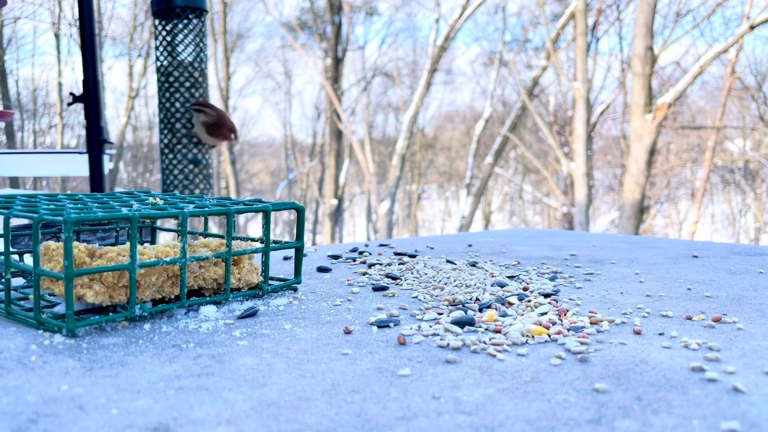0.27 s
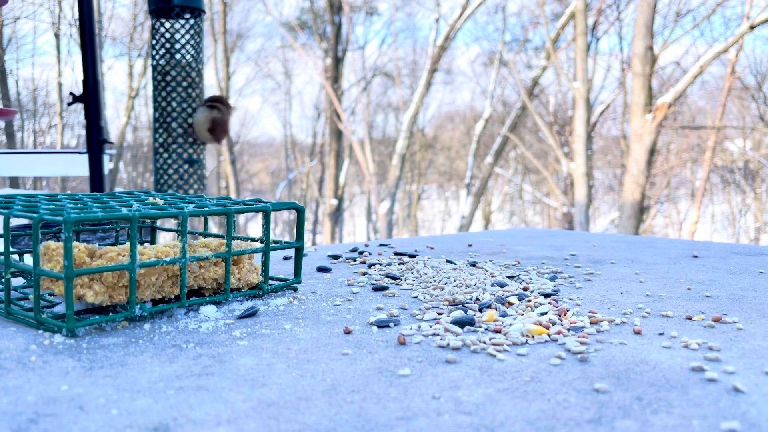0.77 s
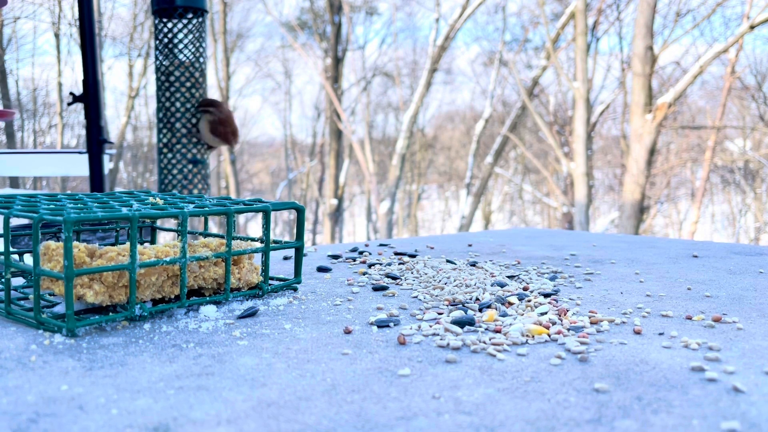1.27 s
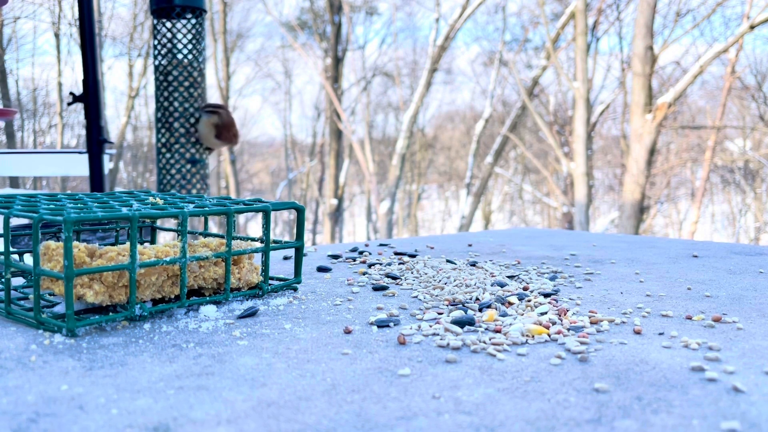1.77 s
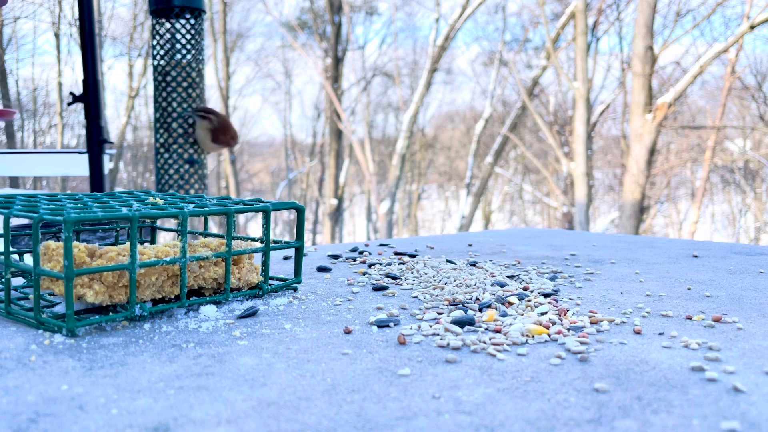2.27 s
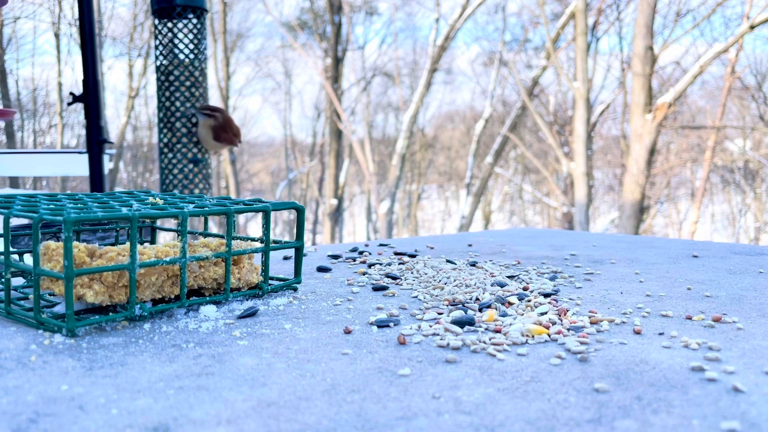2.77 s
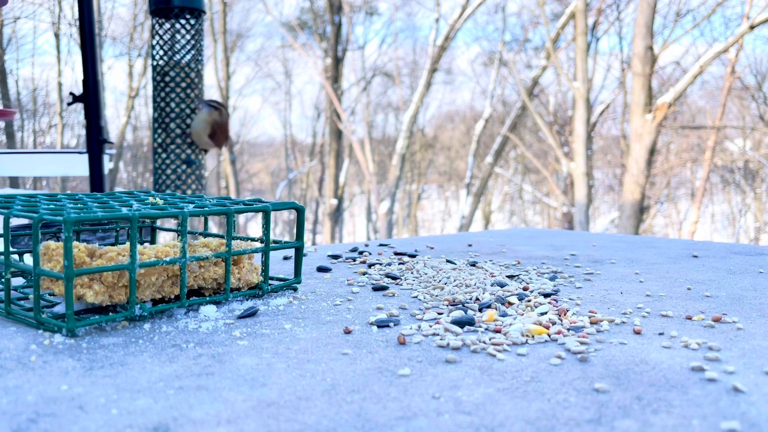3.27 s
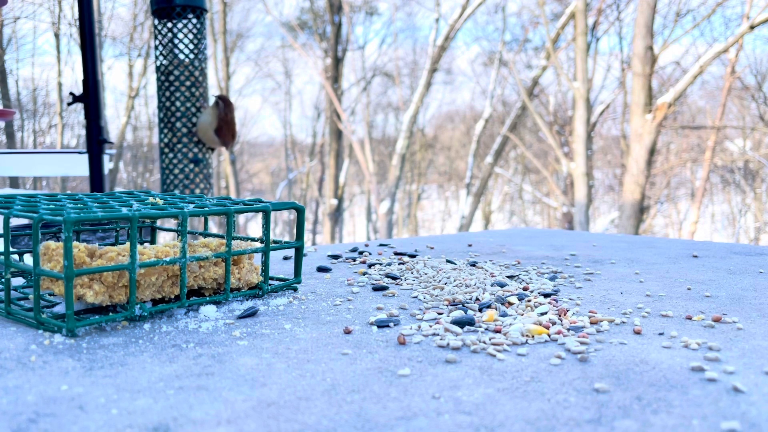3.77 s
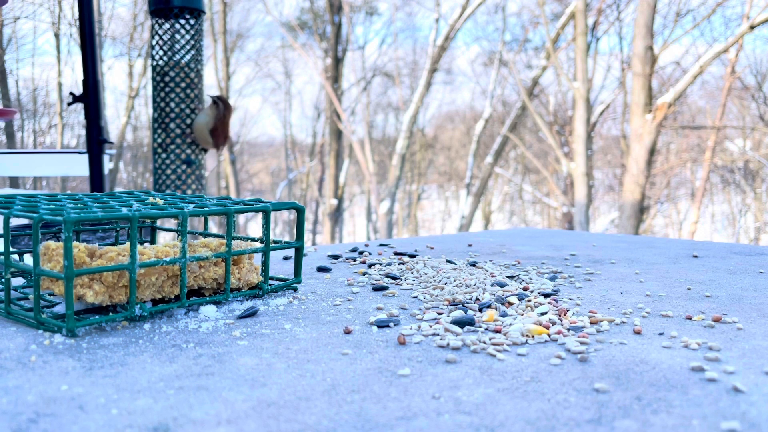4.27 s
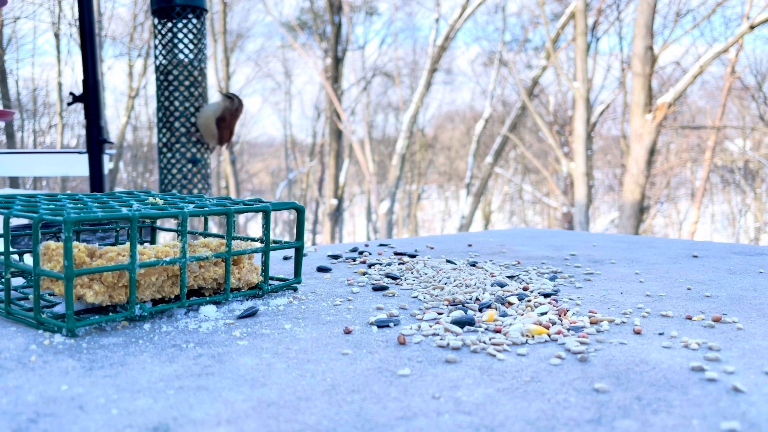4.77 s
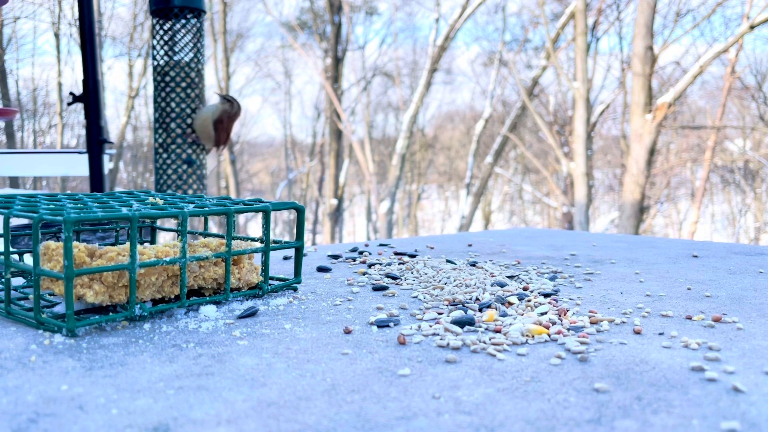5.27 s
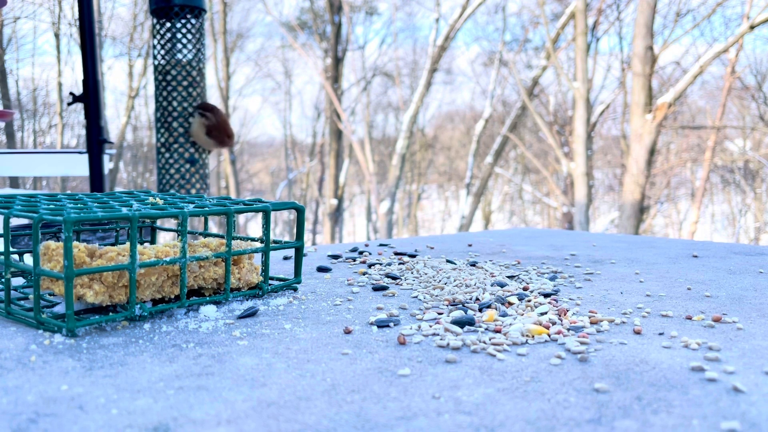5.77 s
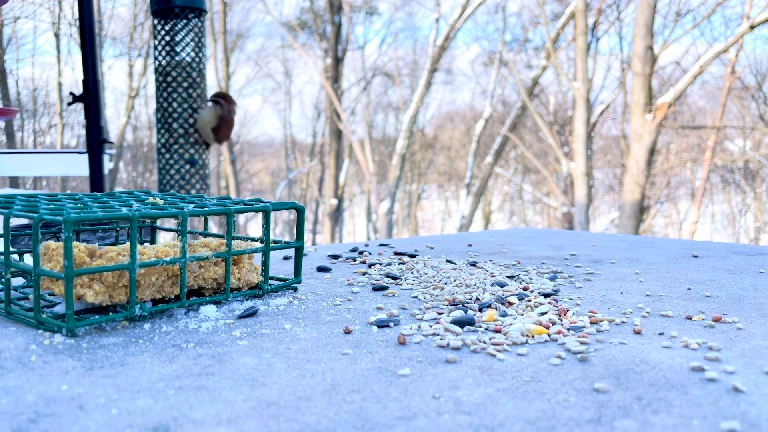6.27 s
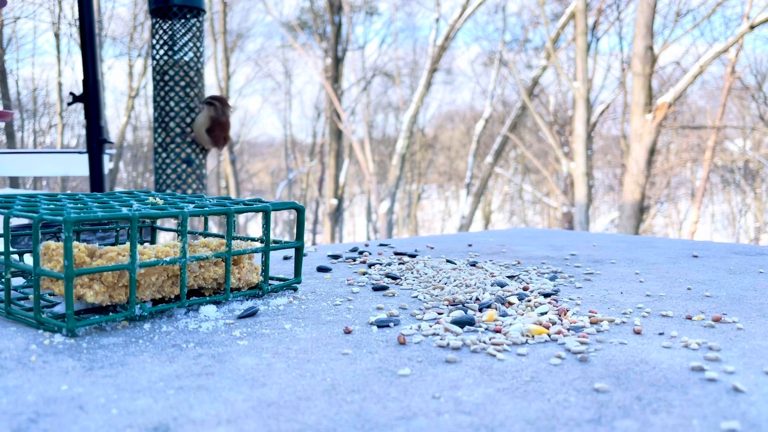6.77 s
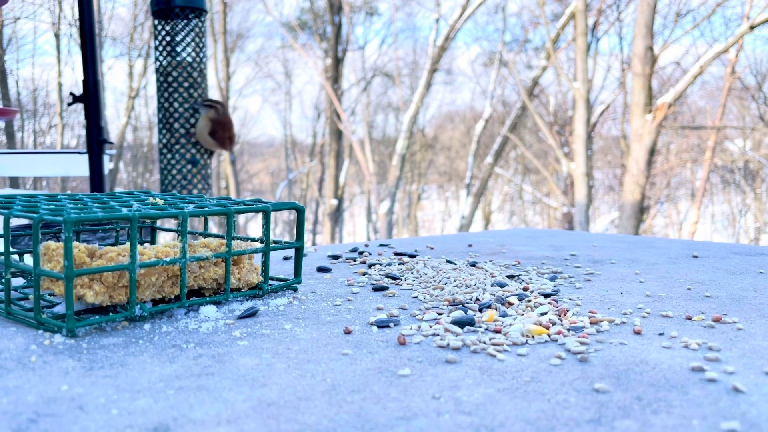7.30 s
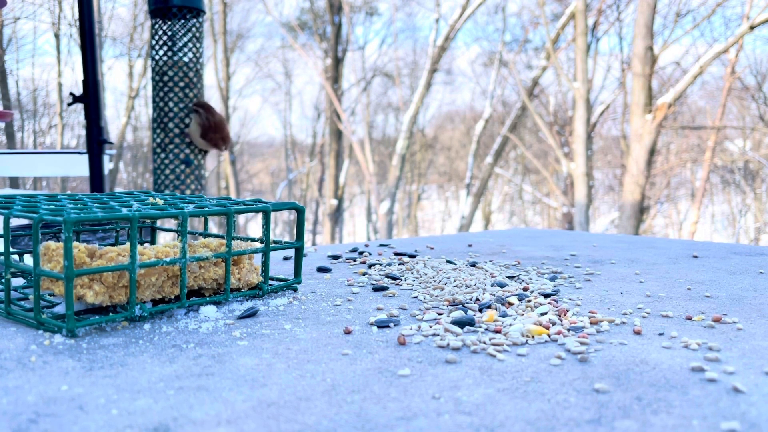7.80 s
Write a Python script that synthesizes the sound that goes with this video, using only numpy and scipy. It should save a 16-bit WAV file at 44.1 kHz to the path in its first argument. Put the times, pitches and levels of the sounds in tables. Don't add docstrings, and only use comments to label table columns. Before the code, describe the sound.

Outdoor winter woods with a soft even road rumble and faint hiss. Crisp little metallic ticks of a beak on mesh come first, mixed with quick claw scratches, then a quiet stretch with a sharp high chip and faint rising song echoing off trunks. Feather rustles lead into more pecks, while low wind buffeting swells over the last seconds.

```python
import sys
import numpy as np
from scipy import signal
from scipy.fft import rfft, irfft, next_fast_len
from scipy.io import wavfile
from scipy.ndimage import uniform_filter1d

SR = 44100
rng = np.random.default_rng(int(sys.argv[2]) if len(sys.argv) > 2 else 0)


def digitize_waveform(pressure):
    field = np.atleast_2d(pressure).T
    bounded = np.clip(field, -1, 1)
    quanta = np.round(bounded * 32767).astype(np.int16)
    wavfile.write(sys.argv[1], SR, quanta)


def boost_factor(decibels):
    exponent = np.asarray(decibels, float) / 20
    return 10 ** exponent


N = 354519
HIT = 8192
SOFT = signal.butter(8, 12700, fs=SR, output="sos")

# f/Hz, width/Hz, level/dB
WIRE_RINGS = [(5780, 740, -0.5), (6740, 790, 0), (8550, 640, -4)]
# f/Hz, width/Hz, level/dB
TICK_RINGS = [(9140, 2400, -11), (11170, 1800, -2), (11800, 1200, 1), (12950, 760, -1.5), (14800, 600, -15),
              (15900, 900, -26.5)]
# t/s, knock level/dB, wire level over knock/dB, tick level over knock/dB, knock f/Hz
BEAK_BLOWS = [(0.1103, -54.5, -7, -1, 2930), (0.814, -54.5, 2, 4.5, 3050),
              (1.0425, -51.5, -4.5, -2.5, 3520), (1.2994, -52, 0, -0.5, 2830), (1.5756, -50, -17, -4, 3000),
              (6.1524, -58, 1.5, -1.5, 3100), (6.3984, -57, 0.6, 4, 4100), (6.659, -49.5, -0.5, -0.5, 4470),
              (6.935, -51.5, -2, 0.1, 3300), (7.6792, -55, 4, -7.5, 4080), (7.9968, -52, 0, -4.5, 2770)]


def pecks():
    out, ms = np.zeros(N + HIT), np.arange(HIT) / SR * 1000
    draws = rng.standard_normal((len(BEAK_BLOWS), 3, HIT))
    tube = signal.butter(2, (900, 4650), "band", fs=SR, output="sos")
    for (s, knock_db, wire_db, tick_db, spot_hz), (sign, size, seeds) in zip(BEAK_BLOWS, draws):
        blow = boost_factor(-21) * sign * np.exp(0.42 * size) * np.exp(-((ms - 1.2) / 1.17) ** 2)
        blow[58] += 1
        blow[40 + round(8 * np.tanh(seeds[1]))] += boost_factor(-4.5) * np.sign(seeds[0])

        fizz = sign * np.exp(0.34 * size) * boost_factor(-6.5 - 60 * ms / 16.5)
        fizz = fizz + signal.sosfilt(SOFT, sign * boost_factor(-43.5 - 60 * ms / 580))
        settle = seeds * np.exp(0.61 * size) * boost_factor(-44 - 60 * ms / 320) * np.clip(ms / 3.3, 0, 1)

        knock = signal.sosfilt(tube, blow + settle + resonate(blow, [(spot_hz, 700, 1.5)]))
        wires = -resonate(blow + 0.3 * settle, WIRE_RINGS)
        tick = resonate(fizz + 0.5 * blow, TICK_RINGS)
        for part, db in ((knock, 4.5), (wires, wire_db), (tick, tick_db)):
            energy = np.sum(part[:400] ** 2)
            out[round(s * SR):][:HIT] += boost_factor(knock_db + db + 25) * part / np.sqrt(energy)
    return out[:N]


# t/s, tick level/dB, lightness (tick over tube knock)/dB, contact/ms
CLAW_SCUFFS = [(0.1217, -76, -5, 2.3), (0.1501, -68.5, 5.5, 2.6), (0.1897, -56.5, 14, 2.3),
               (0.221, -58, 20, 2.6), (0.2676, -49.5, 46, 1.8), (0.32, -73, 16, 1.2), (0.432, -63, 20, 3),
               (0.835, -93, -18, 1.5), (2.074, -64.5, 16.5, 1.8), (3.5552, -84, -1, 2.2),
               (6.5609, -75, 14, .8), (7.0598, -75, 20, .8)]


def scuffs():
    return mesh(CLAW_SCUFFS, wire_follows=0.74, wire_db=11, grit=0.43, rise=0.98, tail_db=-19.5, t60=0.18)


# t/s, tick level/dB, lightness/dB, contact/ms
FEATHER_BRUSHES = [(.018, -84, 14, 6), (.086, -76, 7, 4.9), (.115, -76, 3, 27), (.195, -83, -1, 10),
                   (1.17, -89, 3, 10), (3.87, -96, 10, 14.4), (4.02, -85, 15, 14), (4.11, -93, 14, 14),
                   (4.26, -94, 14, 8), (5.602, -62, 22, 0.57), (5.61, -81, 16, 14), (5.872, -69, 16, 8.3),
                   (5.952, -73.5, 15, 8.9), (6.615, -82, 16, 8), (5.9, -80, 16, 40)]


def brushes():
    rub = mesh(FEATHER_BRUSHES, wire_follows=0.62, wire_db=5, grit=0.8, rise=0.6, tail_db=-42, t60=.1)
    return signal.sosfilt(SOFT, rub)


# f/Hz, width/Hz, level/dB
TUBE_RINGS = [(1700, 520, -1), (2720, 950, -1.5), (4100, 720, -1), (5240, 1500, -6.5)]


def mesh(touches, wire_follows, wire_db, grit, rise, tail_db, t60):
    out, ms = np.zeros(N + HIT), np.arange(HIT) / SR * 1000
    draws = rng.standard_normal((len(touches), 2, HIT))
    for (s, tick_db, light_db, contact_ms), (sign, size) in zip(touches, draws):
        grow = ms / np.clip(contact_ms, .2, 40)
        blow = grow ** rise * np.exp(rise * (1 - grow)) * np.exp(grit * size)
        rattle = boost_factor(tail_db - 60 * ms / (1000 * t60)) * np.clip(ms / 2, 0, 1) * np.exp(0.13 * size)
        soft_rattle = signal.sosfilt(SOFT, sign * rattle)
        tube = (TUBE_RINGS, 19.5 - light_db)
        wires = (WIRE_RINGS, wire_db - wire_follows * light_db)
        for rings, db in (tube, wires, (TICK_RINGS, 8)):
            part = resonate(sign * blow, rings)
            scale = boost_factor(tick_db + db) / np.max(np.abs(part))
            tail = np.std(blow[:200]) * resonate(soft_rattle, rings)
            out[round(s * SR):][:HIT] += scale * (part + tail)
    return out[:N]


def resonate(x, rings):
    out = 0
    for k, (hz, width_hz, db) in enumerate(rings):
        r = np.exp(-np.pi * width_hz / SR)
        poles = [1, -2 * r * np.cos(2 * np.pi * hz / SR), r * r]
        out = out + (-1) ** k * boost_factor(db) * signal.lfilter([1 - r * r, 0, r * r - 1], poles, x)
    return out


# f/Hz, level/dB, phase/rad
LEFT_TO_RIGHT = [(0, 0, 0), (2000, -3.4, -1.8), (2500, -8.6, -2.7), (3000, -14, -2.2), (3500, -19, -3.5),
                 (4000, -12, -5.5), (5000, -5.3, -6.2), (5800, 0.5, -4.9), (6900, 0.3, -5.4),
                 (7600, -3.8, -4.0), (8700, -0.6, -3.05), (13500, 1, -0.3), (22050, 0, 0.3)]


def ports(x):
    size = next_fast_len(N + 512)
    right_db, phase = curve(LEFT_TO_RIGHT, np.arange(size // 2 + 1) * SR / size)
    right = irfft(rfft(x, size) * boost_factor(right_db) * np.exp(1j * phase), size)[:N]
    return np.array([x, right])


# t/s, length/s, start f/Hz, settling f/Hz, level/dB
CHIP_CALLS = [
    (.711, 0.027, 8850, 7170, -70),
    (3.890, 0.027, 8200, 7400, -71),
    (4.348, 0.04, 8200, 6980, -59.5),
]


def chips():
    return calls(CHIP_CALLS, bend=230, wobble=.008, sag=0.09)


# t/s, length/s, start f/Hz, settling f/Hz, level/dB
TICK_CALLS = [
    (2.615, .016, 5100, 4900, -80),
    (4.022, .01, 6700, 6400, -86),
]


def near_ticks():
    return calls(TICK_CALLS, bend=60, wobble=.02, sag=0)[0]


# t/s, length/s, start f/Hz, settling f/Hz, level/dB
HOOKED = [
    (2.79, .16, 2990, 2446, -84.5),
    (3.05, .08, 2470, 2370, -93),
]
# t/s, length/s, start f/Hz, settling f/Hz, level/dB
SLIDING = [
    (.87, .13, 2900, 1900, -92),
    (7.82, .27, 3020, 1450, -86.5),
]


def whistles():
    hooked = calls(HOOKED, bend=28, wobble=.003, sag=0)
    return (hooked + calls(SLIDING, bend=2.9, wobble=0.0033, sag=0))[0]


# t after start/s, length/s, start f/Hz, settling f/Hz, level/dB
NOTES = [
    (0, 0.27, 7180, 11550, -10.5),
    (0.275, 0.21, 7200, 9550, -1),
]
# t/s, level/dB, share of the pitch rise 0-1
SUNG = [
    (2.44, -88.5, 0.78),
    (5.16, -92, .62),
]


def song():
    rows = []
    for s, db, span in SUNG:
        for after, length, start_hz, end_hz, note_db in NOTES:
            top_hz = start_hz + span * (end_hz - start_hz)
            rows.append((s + after, length, start_hz, top_hz, db + note_db))
    return calls(rows, bend=4.5, wobble=0.022, sag=0)[0]


def calls(rows, bend, wobble, sag):
    out = np.zeros((2, N + SR))
    quiver = rms_one(uniform_filter1d(rng.standard_normal(N + SR), size=150))
    for s, length, start_hz, end_hz, db in rows:
        t = np.arange(int(length * SR)) / SR
        hz = end_hz + (start_hz - end_hz) * np.exp(-bend * t)
        hz = hz * (1 - sag * boost_factor(db + 60.5) * (t / length) ** 7)
        shaky_hz = hz * (1 + wobble * quiver[round(s * SR):][:len(t)])
        phase = 2 * np.pi * np.cumsum(shaky_hz) / SR
        breath = np.sin(np.pi * t / length)
        octave = boost_factor(db + 40) * breath * np.sin(2 * phase)
        pair = np.array([np.sin(phase), octave])
        out[:, round(s * SR):][:, :len(t)] += boost_factor(db) * breath ** 0.57 * pair
    return out[:, :N]


def echoes(x, t60, delay, sparse):
    t = np.arange(SR // 2) / SR
    swarm = rng.standard_normal(len(t)) * np.exp(sparse * rng.standard_normal(len(t)))
    swarm = swarm * boost_factor(-60 * t / t60) * np.clip(t / delay - 1, 0, 1)
    return signal.fftconvolve(x, swarm / np.sqrt(np.sum(swarm ** 2)))[:N]


def birds():
    chip, octave = chips()
    far = song() + whistles()
    direct = ports(chip + octave + near_ticks()) + boost_factor(2) * far
    sent = boost_factor(-2.5) * chip + boost_factor(4.5) * far
    woods = np.array([echoes(sent, t60=0.52, delay=0.0049, sparse=0.46) for side in (0, 1)])
    return direct + woods


# peak t/s, half width/s, level/dB, quickness (0 thump - 1 flutter)
WIND_EDDIES = [(.04, 0.054, -51.5, 0.12), (.11, 0.016, -47, 1.1), (.22, 0.029, -48, 0.55),
               (.83, 0.036, -57, 0.5), (1.25, 0.078, -57, 0.86), (1.43, .05, -59, 0.54),
               (1.88, 0.033, -60, 0.93), (2.28, .04, -52.5, 0.13), (3.08, 0.03, -51, 0.26),
               (3.17, 0.062, -51.5, .4), (3.265, 0.028, -41.5, 0.49), (3.4, 0.03, -52, 0.53),
               (3.51, 0.045, -52, .15), (3.65, .06, -50, 0.3), (3.78, 0.034, -52.5, 0.65),
               (4.41, .08, -64, 0.58), (4.84, 0.031, -53.5, .3), (6.15, 0.044, -47.5, 0.42),
               (6.54, 0.057, -56.5, 1.1), (6.70, 0.026, -39.5, 0.55), (6.77, 0.077, -42.5, 0.54),
               (7.05, 0.057, -41.5, .55), (7.16, 0.018, -44, 0.55), (7.235, .05, -33.5, 0.93),
               (7.36, .06, -40, 0.17), (7.565, 0.032, -34, 0.44), (7.65, 0.067, -43.5, 0.87),
               (7.775, 0.033, -34, .7), (7.86, 0.076, -44, 0.5), (8.01, .04, -46.5, 0.53)]


def wind():
    thump = gusts(38, 60, alike=0.64, even=.45)
    flutter = gusts(59.5, 100.3, alike=.62, even=0.56)
    lumps = [rms_one(uniform_filter1d(uniform_filter1d(row, size=3000), size=3000))
             for row in rng.standard_normal((2, N))]
    slow = boost_factor(-67 + 3 * lumps[0])
    quick = boost_factor(-61 + 3 * lumps[1])
    for s, half_s, db, quickness in WIND_EDDIES:
        push = boost_factor(db) * swell(s, half_s)
        turn = np.pi / 2 * np.clip(quickness, 0, 1)
        slow = slow + np.cos(turn) * push
        quick = quick + np.sin(turn) * push
    return slow * thump + quick * flutter


def gusts(low_hz, high_hz, alike, even):
    band = signal.butter(2, [low_hz, high_hz], "band", fs=SR, output="sos")
    mid, side = signal.sosfilt(band, rng.standard_normal((2, N + SR)))[:, SR:]
    size = np.sqrt(uniform_filter1d(mid ** 2, size=1200))
    mid = rms_one(mid / (size + 0.09 * np.mean(size)) ** even)
    return mid + np.sqrt((1 - alike) / (1 + alike)) * rms_one(side) * [[1], [-1]]


def swell(s, half_s):
    return np.exp(-((np.arange(N) / SR - s) / np.clip(half_s, .01, 1)) ** 2)


def engine():
    t = np.arange(N) / SR
    note = boost_factor(-55.5) * swell(7.09, 0.21) * np.sin(2 * np.pi * 281 * t)
    return note * boost_factor([[-8], [3]]) + boost_factor(-107) * np.sin(2 * np.pi * 4260 * t)


# f/Hz, level per Hz/dB
ROAD_COLOUR = [(40, -21.5), (80, -15.5), (118, -0.5), (153, -6), (251, -6), (382, -11), (449, -9.5),
               (739, -7.5), (1150, -14), (1740, -26.5), (2310, -45), (2900, -60.5), (5000, -92)]
# f/Hz, level per Hz/dB
HISS_COLOUR = [(1500, -3), (2600, 5), (4500, 4.5), (6500, 1.5), (9000, -0.5), (12700, -2.5), (13200, -16.5),
               (17000, -21)]


def road_and_hiss():
    return boost_factor(-50) * diffuse(ROAD_COLOUR) + boost_factor(-88) * diffuse(HISS_COLOUR)


# f/Hz, likeness 0-1, phase/rad, right level/dB
ALL_AROUND = [(0, 0.87, -0.5, -1), (203, 0.68, 0, 0.5), (546, 0, 1, -3), (990, 0.38, -1, -1.5),
              (2500, 0, -0.5, -2.5), (4900, 0.3, -3, -3.5), (6100, .05, 1, -6.5), (7400, 0.3, -4, -1.5),
              (7820, 0.94, -3, -1.2), (9900, 0.94, -2.5, .3), (10800, 0.9, -2.0, -1), (12800, 1, 0.3, 1),
              (22050, .5, 1.5, -1)]


def diffuse(colour):
    size = next_fast_len(N)
    hz = np.arange(size // 2 + 1) * SR / size
    table = np.array(colour)
    gain = boost_factor(np.interp(np.log(hz + 1), np.log(table[:, 0]), table[:, 1], left=-80))
    alike, phase, right_db = curve(ALL_AROUND, hz)
    alike = np.clip(alike, 0, 1)
    left, other = rfft(rng.standard_normal((2, size)))
    right = alike * np.exp(1j * phase) * left + np.sqrt(1 - alike ** 2) * other
    return rms_one(irfft(gain * np.array([left, boost_factor(right_db) * right]), size)[:, :N])


def curve(rows, hz):
    x, *columns = np.transpose(rows)
    return [np.interp(hz, x, c) for c in columns]


def rms_one(x):
    return x / np.sqrt(np.mean(x ** 2) + 1e-20)


def scene():
    feeder = pecks() + scuffs() + brushes()
    return ports(feeder) + birds() + wind() + engine() + road_and_hiss()


def band_limit(x):
    return signal.sosfilt(signal.butter(12, 16520, fs=SR, output="sos"), x)


def record(dry):
    low_cut = signal.butter(3, 30, "high", fs=SR, output="sos")
    top_cut = signal.cheby2(10, 60, 16700, fs=SR, output="sos")
    faded = dry * np.clip(np.arange(N) / 150, 0, 1)
    mix = signal.sosfilt(np.vstack([low_cut, top_cut]), faded)
    return band_limit(mix)


dry = scene()
out = record(dry)
digitize_waveform(out)
```